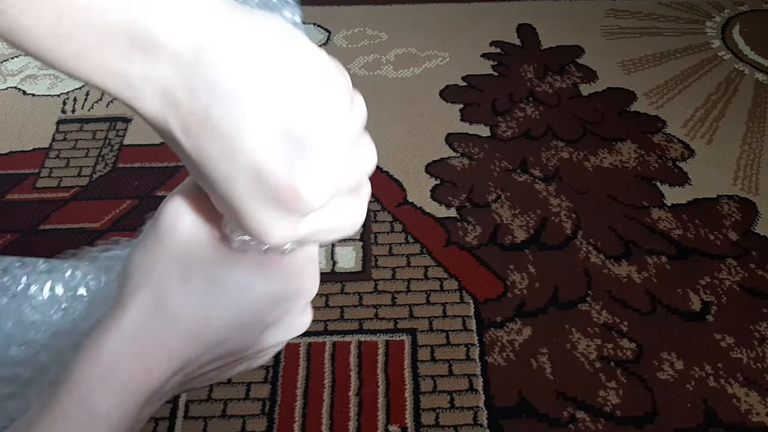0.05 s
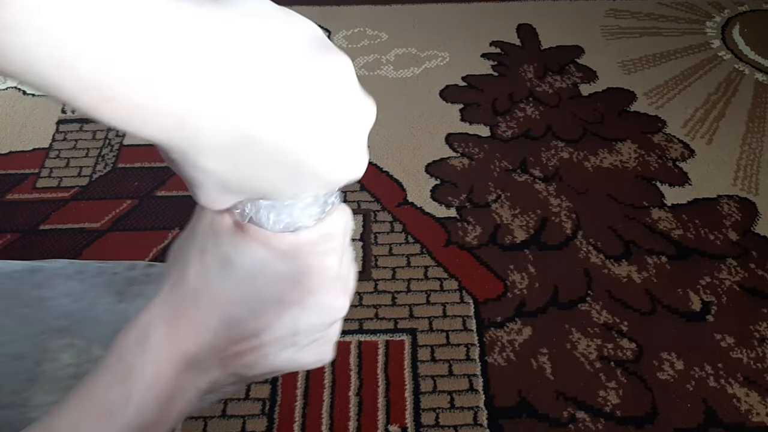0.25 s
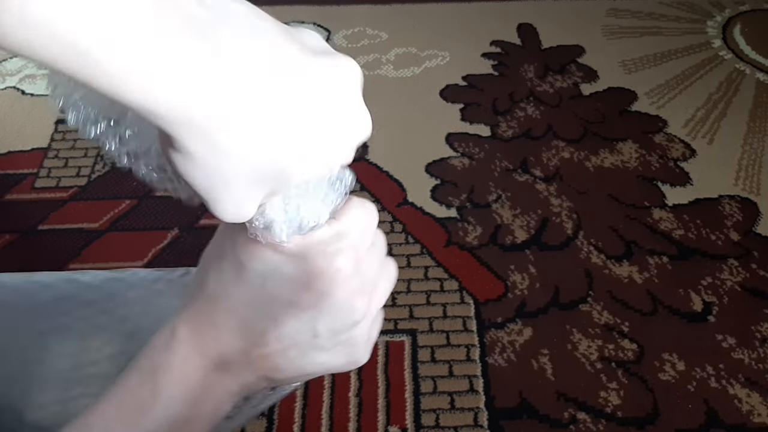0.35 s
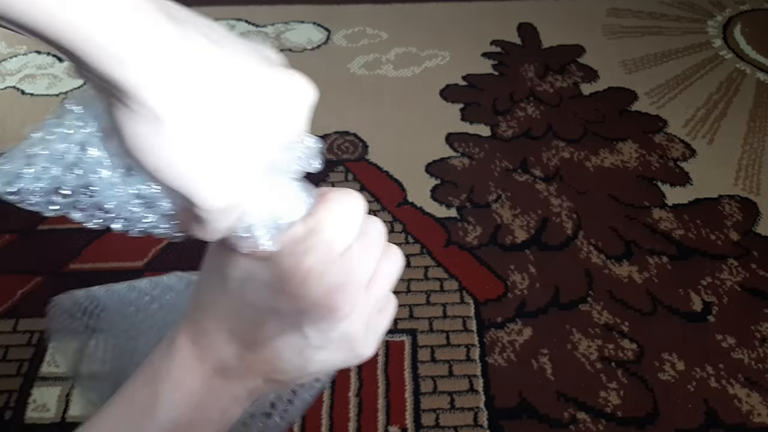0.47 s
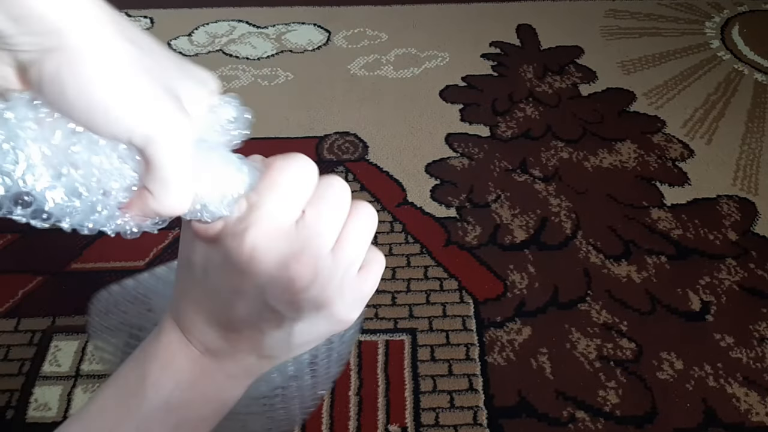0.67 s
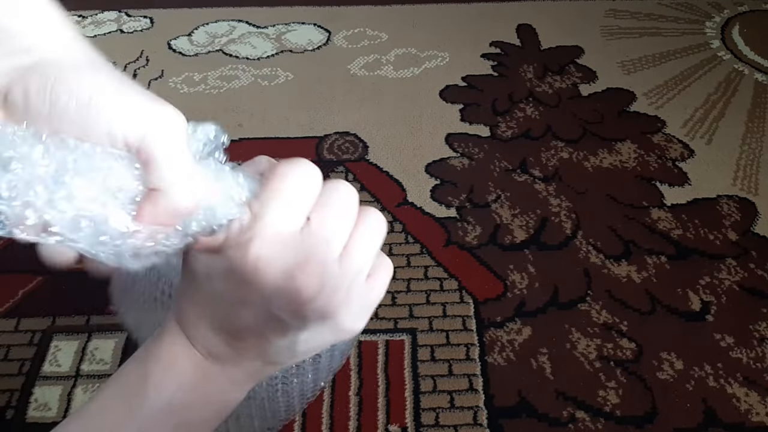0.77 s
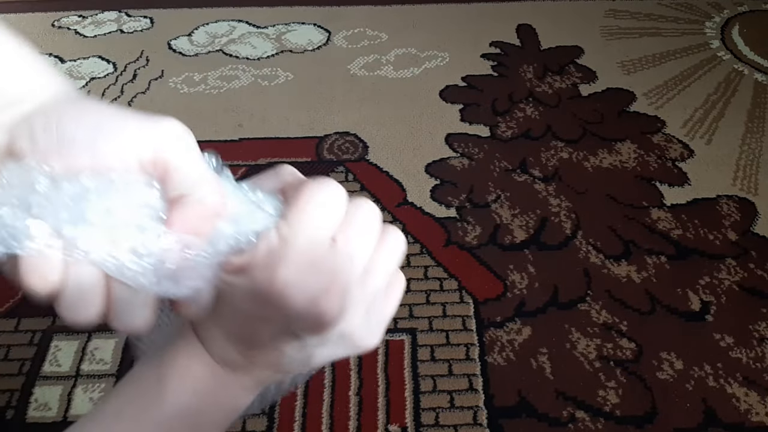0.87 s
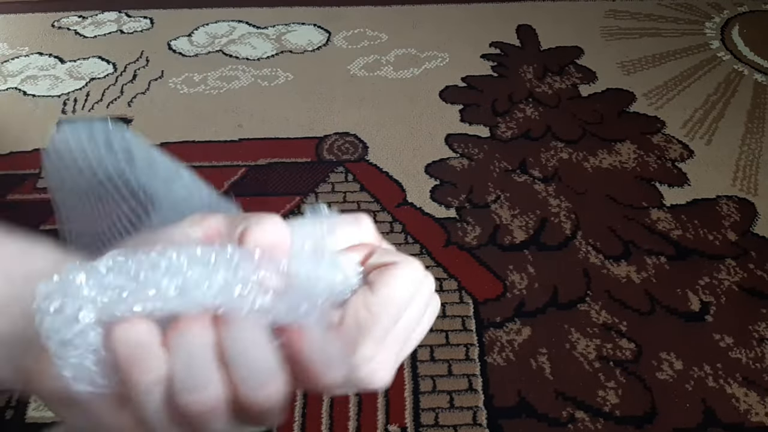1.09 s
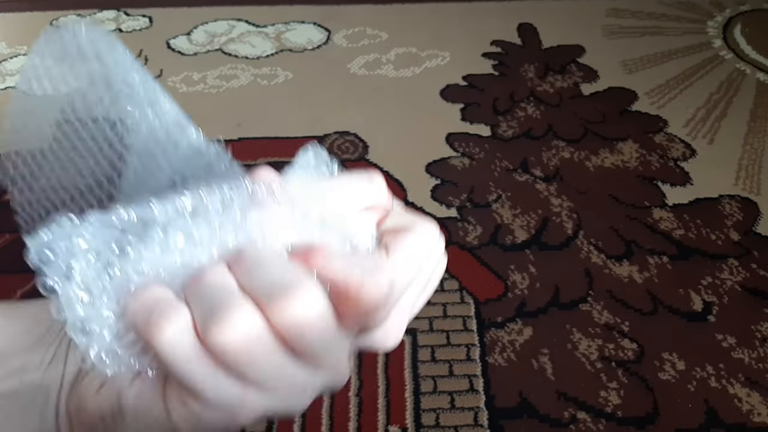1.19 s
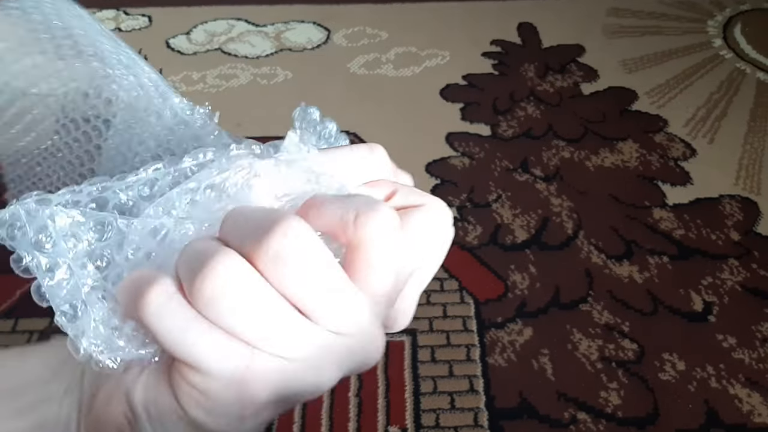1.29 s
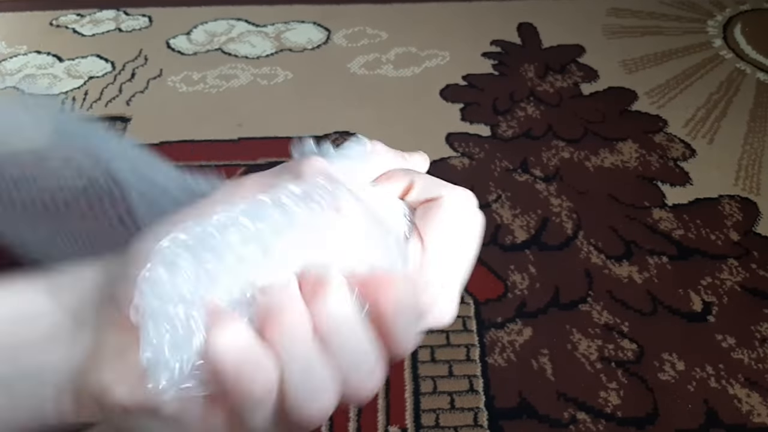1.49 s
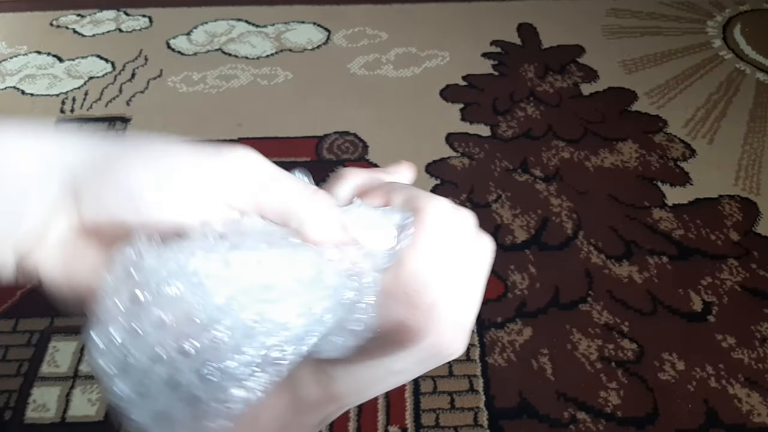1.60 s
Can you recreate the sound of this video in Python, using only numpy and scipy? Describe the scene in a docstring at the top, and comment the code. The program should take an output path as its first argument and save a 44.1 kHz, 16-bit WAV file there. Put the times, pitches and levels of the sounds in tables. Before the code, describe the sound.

Hands wring bubble wrap, setting off rapid snapping pops and plastic crackle.

```python
"""A small furnished room: two hands wring a roll of bubble wrap close to a stereo microphone.
Each twist is a swell of tiny film crinkles. Bubbles snap one by one, each an air pulse plus film
crackle, and a few push out a dull puff of air. Faint hiss and hum lie underneath.
The loudest snaps overload the recorder."""
import sys
import numpy as np
from scipy import signal
from scipy.fft import rfft, irfft, next_fast_len
from scipy.io import wavfile

SR = 44100
rng = np.random.default_rng(int(sys.argv[2]) if len(sys.argv) > 2 else 0)


def generate_wav(signal):
    """Clip the signal to [-1, 1] and save it as 16-bit WAV at the path in sys.argv[1]."""
    frames = np.transpose(np.atleast_2d(signal))
    scaled = np.clip(frames, -1, 1) * 32767
    pcm = np.round(scaled).astype(np.int16)
    wavfile.write(sys.argv[1], SR, pcm)


N = 72765

# crinkling film spectrum: f/Hz, level/dB
FILM_SPECTRUM = [(40, -36), (150, -26), (400, -18), (700, -8.5), (1500, -1.5), (2600, 3), (5000, 3),
                 (9000, -8.5), (16000, -7)]
LAG_MS = 0.095  # right mic port behind left


def amp(db):
    """dB to gain."""
    return 10 ** (np.asarray(db) / 20)


def unit(x):
    """Scale to rms 1."""
    return x / np.sqrt(np.mean(x ** 2) + 1e-20)


def along(points, hz):
    """Interpolate (f/Hz, value) points over log f."""
    f, values = np.transpose(points)
    return np.interp(np.log(hz + 1), np.log(f + 1), values)


def filtered(x, response):
    """Apply a complex frequency response."""
    n = x.shape[-1]
    n_fft = 2 * next_fast_len(n // 2 + 2048)
    hz = np.fft.rfftfreq(n_fft, 1 / SR)
    return irfft(rfft(x, n_fft) * response(hz), n_fft)[..., :n]


def coloured(x, points, tilt_db_oct=0):
    """Minimum-phase filter through (f/Hz, level/dB) points, tilted above 500 Hz."""
    def response(hz):
        gain_db = along(points, hz) + tilt_db_oct * np.log2(np.maximum(hz, 500) / 4000)
        cepstrum = irfft(np.log(amp(gain_db)))
        half = len(cepstrum) // 2
        return np.exp(rfft(np.r_[cepstrum[0], 2 * cepstrum[1:half], np.zeros(half)]))
    return filtered(x, response)


def at_ports(x, lag_ms):
    """Mono to the two mic ports, right one delayed."""
    right = filtered(x, lambda hz: np.exp(-2j * np.pi * hz * lag_ms / 1000))
    return np.array([x, right])


def add(out, start_s, x):
    """Mix x into out."""
    i = max(0, round(start_s * SR))
    out[..., i:i + x.shape[-1]] += x[..., :out.shape[-1] - i]


def swing(t, hz, cycles):
    """Damped air oscillation, down to 1/e after `cycles`."""
    return np.sin(2 * np.pi * hz * t) * np.exp(-hz * t / cycles)


def background():
    """Faint hiss and low hum."""
    # noise floor: f/Hz, level/dB
    floor_spectrum = [(30, -10), (120, 1), (200, -24), (450, -6), (1500, -1), (5000, 6.5), (8000, 0.5),
                      (16000, -6.5)]
    hiss = unit(coloured(rng.standard_normal((2, N)), floor_spectrum))
    hum = np.sqrt(2) * np.sin(2 * np.pi * 124 * np.arange(N) / SR)
    return amp(-47) * hiss + amp(-77) * hum


def crinkles(per_s, spots=4, spread_db=8.5):
    """Film creases: tiny clicks of uneven size from several spots on the roll."""
    shape = (spots, N)
    clicks = (rng.random(shape) < per_s / spots / SR) * rng.choice([-1, 1], shape)
    sizes = amp(spread_db * np.minimum(rng.standard_normal(shape), 2))
    lags_ms = LAG_MS + 0.072 * np.linspace(-1, 1, spots)  # width of the roll
    return sum(at_ports(train, lag_ms) for train, lag_ms in zip(clicks * sizes, lags_ms))


def handling():
    """Light rustle of the wrap held in the hands."""
    return amp(-45.5) * unit(coloured(crinkles(per_s=900), FILM_SPECTRUM))


def twists(ring_hz=4400, ring_width_oct=1):
    """Crinkle clouds swell and fade, denser for harder twists; taut bubbles ring in one band."""
    # twists and small shifts: peak t/s, level/dB, rise/(dB/s), fall/(dB/s), tilt/(dB/oct), ring/dB
    moves = [(.155, -38.5, 340, 898, 1, 14), (0.228, -23, 154, 289, 0.5, -1),
             (0.331, -29.5, 265, 89, 1, -1), (0.391, -10.5, 608, 336, -1.5, 12.5),
             (0.404, -8.5, 513, 320, 0.5, 6), (0.493, -28.5, 200, 348, -1.5, -4.5),
             (0.723, -29, 224, 213, 2, -4), (.775, -33, 237, 170, 13.5, 18),
             (.83, -43.5, 196, 141, -13.5, 29), (0.974, -16.5, 1704, 304, 1, 15),
             (1.036, -16, 408, 222, 0.5, -2), (1.095, -34, 703, 330, 26, -6),
             (1.275, -42.5, 209, 150, 8, 13), (1.452, -34.5, 447, 202, 10, 13),
             (1.503, -30.5, 193, 126, 2, -1), (1.581, -33.5, 138, 142, -1, -4)]

    def ring_band(hz):
        return np.exp(-(np.log2((hz + 1) / ring_hz) / ring_width_oct) ** 2)

    t = np.arange(N) / SR
    out = np.zeros((2, N))
    for peak_s, level_db, rise_db_s, fall_db_s, tilt_db_oct, ring_db in moves:
        cloud = crinkles(per_s=9000 * amp(level_db + 12) ** 0.35)
        film = coloured(cloud, FILM_SPECTRUM, tilt_db_oct)
        ringing = filtered(film, lambda hz: amp(ring_db * ring_band(hz)))
        below_peak_db = np.maximum(rise_db_s * (peak_s - t), fall_db_s * (t - peak_s))
        out += unit(ringing) * amp(level_db - below_peak_db)
    return out


def snaps(pulse_rise_s=0.00006, crackle_rise_s=0.0001, crackle_t60_s=0.0031):
    """A bubble gives way: a sharp push and pull of air, then brief film crackle, into the room."""
    # bubbles and creases: t/s, relative pulse level/dB, f/Hz, decay/cycles, relative crackle level/dB
    bursts = [(0.1529, -12.5, 5000, 1.5, -21), (0.226, -4, 4700, 0.36, -32), (.233, -1, 2650, 0.32, -39),
              (0.3105, -2, 3030, 0.22, -22.5), (0.3166, 2, 3330, 0.17, -32), (0.3232, 0.5, 3300, 0.35, -45),
              (.3337, 1, 3140, 0.26, -27), (0.3492, 3, 3480, 0.35, -14.5), (0.3510, -7, 2940, 0.18, -30),
              (0.3595, 0, 2190, 0.56, -20), (0.3735, 4, 3700, 0.69, -9.5), (0.382, -1.5, 4340, 2, -11),
              (0.3884, 1.5, 2840, 1.5, -3.5), (.447, 2, 1096, 0.41, -8.5), (0.5065, -11, 7340, 2.3, -17),
              (0.51, -5, 6500, 0.43, -17.5), (0.57275, -1.5, 5900, 2.2, -13),
              (0.57282, 1.5, 1550, 0.42, -14), (0.57409, -4, 1500, 0.45, -21),
              (0.6662, -11.5, 5450, 3.5, -21), (0.6668, -20, 950, .4, -19), (0.7235, -11, 5000, 0.68, -27),
              (0.7712, 8, 6900, 0.44, -16), (0.7712, -2, 1310, 0.2, -33), (0.814, -17, 4080, 4.7, -24),
              (0.8152, -15.5, 1020, 0.64, -17.5), (0.8501, -8.5, 1190, 0.17, -14.5),
              (0.9437, -16, 8040, .5, -46), (0.9609, -1.5, 2850, 1.06, -5), (0.9701, 5, 4300, 0.64, -11.5),
              (0.9743, 6, 5200, 1.4, -9), (1.002, -9, 1300, .3, -13), (1.00205, -1, 10500, 2, -11),
              (1.0127, 2, 4900, 1.5, -8), (1.0243, 6.5, 2930, 0.47, -8), (1.0762, 4.5, 2580, 0.34, -22),
              (1.084, -13.5, 910, 0.37, -6), (1.1543, 3.5, 2200, 0.35, -16),
              (1.2263, 2.5, 2130, 0.28, -17.5), (1.2481, -13.5, 1670, 0.94, -21),
              (1.296, -10.5, 1040, 0.19, -22), (1.2957, -21, 3290, 4, -16.5),
              (1.381, -18.5, 4340, 0.6, -27.5), (1.4565, -15, 5200, .8, -33), (1.464, -10, 12000, 1.2, -23),
              (1.4673, -8, 9000, .4, -26), (1.482, -9, 6000, 0.56, -32), (1.4913, -18, 6000, .5, -27),
              (1.5044, 0.5, 2320, 0.21, -16.5)]
    # snapping film spectrum: f/Hz, level/dB
    crackle_spectrum = [(100, -28), (500, -10.5), (1500, -0.5), (5000, 8.5), (9000, 1.5), (16000, 2)]
    # wrung spot moving with the hands: t/s, right port lag/ms
    lag_path = [(.45, .11), (.6, .13), (.67, .18), (.85, .16), (1.0, .1), (1.3, .07)]
    t = np.arange(SR // 50) / SR
    envelope = amp(-60 * t / crackle_t60_s) * (1 - np.exp(-t / crackle_rise_s))
    out = np.zeros((2, N))
    for start_s, pulse_db, hz, cycles, crackle_db in bursts:
        flow = swing(t, hz, cycles) * (1 - np.exp(-t / pulse_rise_s))
        pressure = np.diff(flow, prepend=0) * SR / (2 * np.pi * hz)
        crackle = coloured(rng.choice([-1, 1], (2, len(t))) * envelope, crackle_spectrum)
        lag_ms = np.interp(start_s, *np.transpose(lag_path))
        snap = amp(pulse_db) * at_ports(pressure, lag_ms) + amp(crackle_db) * crackle
        add(out, start_s, room(2 * snap))
    return out


def puffs(room_send_db=-12.5):
    """Dull pushes of air hit the ports directly and barely stir the room."""
    # air from the squeezed roll: t/s, level/dB, f/Hz
    pushes = [(0.375, -23, 200), (0.447, -17, 395), (0.5723, -24, 109), (0.7194, -18, 550),
              (0.7708, -24.5, 129), (0.8513, -28.5, 250), (0.9603, -24.5, 300), (1.0014, -8, 375),
              (1.0838, 1, 354), (1.227, -22.5, 300)]
    t = np.arange(SR // 20) / SR
    air = np.zeros(N)
    for start_s, level_db, hz in pushes:
        add(air, start_s, amp(level_db) * swing(t, hz, cycles=0.17))
    direct = at_ports(air, LAG_MS)
    reflected = room(direct)[:, :N] - direct
    return direct + amp(room_send_db) * reflected


def room(x, build_s=0.0023, scatter_t60_s=0.015):
    """Direct sound, close scatter off the moving hands, short room tail; drawn anew per call."""
    # room decay: f/Hz, T60/s
    tail_t60 = [(150, 0.16), (800, 0.22), (2500, 0.23), (6000, 0.14), (15000, 0.2)]
    # room tail spectrum: f/Hz, level/dB
    tail_spectrum = [(100, 5), (280, -0.5), (430, 3.5), (650, 1.5), (1500, -3), (5000, 1.5), (15000, 0)]
    # close scatter spectrum: f/Hz, level/dB
    scatter_spectrum = [(100, -26), (700, -6), (2000, -4.5), (15000, 0)]
    hz, frame_s, bands = signal.stft(rng.standard_normal((2, SR // 5)), SR, nperseg=256)
    decay = amp(-60 * frame_s / along(tail_t60, hz)[:, None])
    _, tail = signal.istft(bands * decay, SR, nperseg=256)
    t = np.arange(tail.shape[1]) / SR
    tail *= 1 - np.exp(-(t / build_s) ** 2)
    impulse = amp(-6.5) * coloured(tail / np.linalg.norm(tail[0]), tail_spectrum)
    t = t[:SR // 40]
    scatter = rng.standard_normal((2, len(t))) * amp(-60 * t / scatter_t60_s) * (t > 0.0004)
    add(impulse, 0, amp(-6) * coloured(scatter / np.linalg.norm(scatter[0]), scatter_spectrum))
    impulse[:, 0] += 1  # direct path
    return signal.fftconvolve(x, impulse, axes=1)


def scene():
    """The wrap in the room, slightly left, over the background."""
    balance_db = 0.16
    crinkling = room(handling() + twists())[:, :N]
    wrap = crinkling + snaps() + puffs()
    return wrap * amp([[balance_db], [-balance_db]]) + background()


def record(dry):
    """Mic colour, hard overload, 16 kHz band limit."""
    # mic response: f/Hz, gain/dB
    mic_response = [(30, -13), (300, 0.5), (460, 3.5), (610, -3.5), (800, -1), (3500, -1.5), (5200, -1),
                    (6500, 2), (7600, -4), (10500, 1.5), (13000, -4.5), (16000, -2.5)]
    clipped = np.clip(coloured(dry, mic_response), -0.88, 0.88)
    return filtered(clipped, lambda hz: hz < 16000)


dry = scene()
out = record(dry)
generate_wav(out)
```